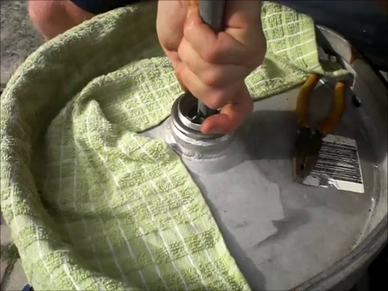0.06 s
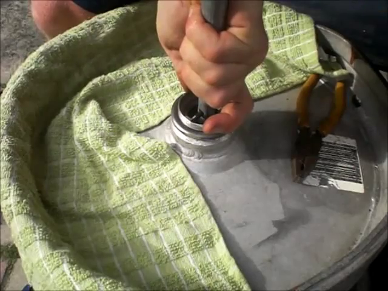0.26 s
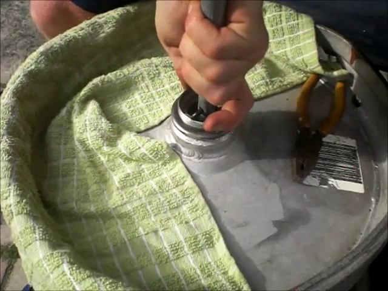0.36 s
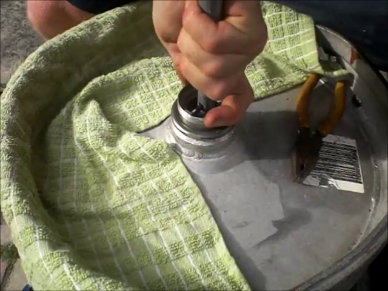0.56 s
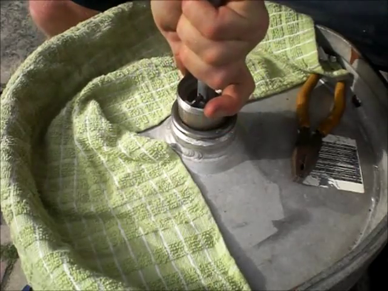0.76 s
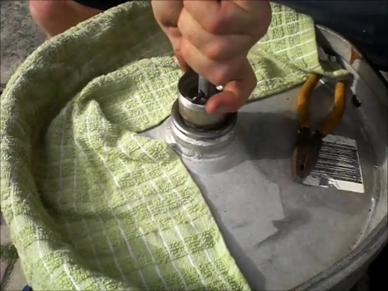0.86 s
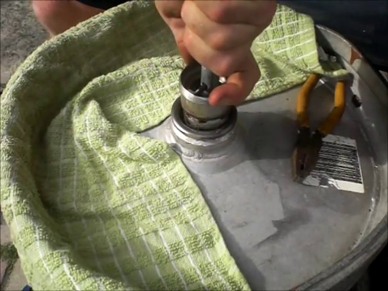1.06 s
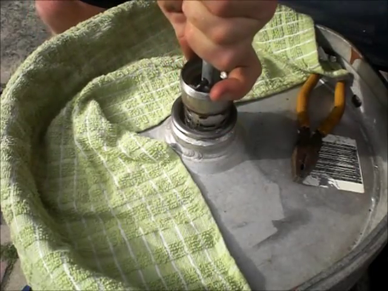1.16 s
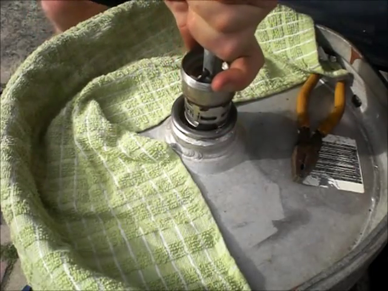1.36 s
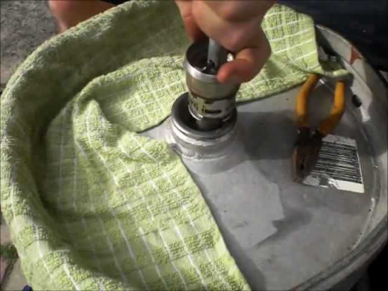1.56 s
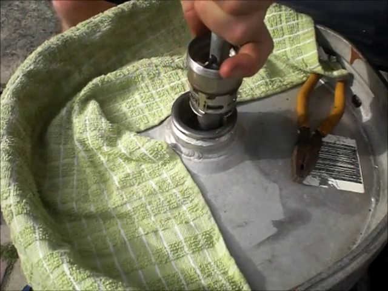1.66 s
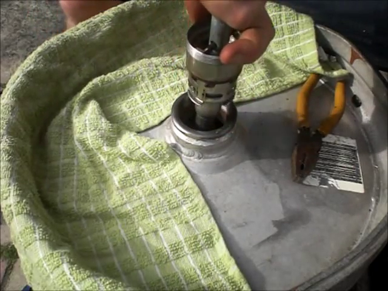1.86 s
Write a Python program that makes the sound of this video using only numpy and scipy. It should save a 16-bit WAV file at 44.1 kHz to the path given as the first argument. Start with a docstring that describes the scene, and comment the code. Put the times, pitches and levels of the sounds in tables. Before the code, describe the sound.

A metal valve knocks and scrapes out of an empty steel keg, close by indoors. Gas hisses thinly first, the valve judders loose with small ticks, then its tube bumps and rubs out with a fading hollow ring.

```python
"""A valve and its long tube are worked out of the neck of an empty steel keg, close by, indoors.
First gas hisses thinly past the seal while the seated valve knocks dully and turns.
Next the valve judders up through the neck, sticking and slipping, and steel edges tick together.
Then the tube bumps and rubs on its way out, ringing with a hollow note that slowly sinks.
Last, the ringing fades and the gas breathes softly from the open neck over a low room murmur."""
import sys
import numpy as np
from scipy import signal
from scipy.fft import rfft, irfft
from scipy.io import wavfile

SR = 44100
rng = np.random.default_rng(int(sys.argv[2]) if len(sys.argv) > 2 else 0)


def file_out(sig):
    """Save sig as 16-bit WAV at sys.argv[1]."""
    # one column per channel
    cols = np.atleast_2d(sig).T
    # limit, then scale
    lim = np.clip(cols, -1, 1)
    pcm = np.round(lim * 32767).astype(np.int16)
    wavfile.write(sys.argv[1], SR, pcm)


N = 83790
T = np.arange(N) / SR

# Blows on the neck: t/s, thud level/dB, thud cut-off f/Hz,
# then level/dB for the boom, hollow, middle, upper and shell notes
KNOCKS = [(.169, -24, 2050, -40, -55, -39, -29, -44), (.2352, -7, 3030, -21, -22.5, -16.5, -55, -26.5),
          (.3395, -4.5, 770, -24, -38, -52, -50, -60), (.3442, -3, 930, -19, -38, -37, -36, -52),
          (.3735, -9, 690, -41, -23.5, -16, -33, -45), (.3803, -4, 750, -44, -10, -11.5, -40, -53),
          (.3885, -8, 2210, -31, -14.5, -16.5, -23, -17), (.3962, -12.5, 2600, -56, -59, -22, -34, -18.5),
          (.564, -23, 1000, -68, -17.5, -23, -25, -40), (0.7066, -13.5, 2800, -46, -23, -16, -14, -45),
          (.868, -9, 850, -20.5, -10.5, -19.5, -17, -45), (1.0022, -12.5, 2210, -26.5, -14, -13, -5, -49),
          (1.073, -12, 1420, -33, -24.5, -14.5, -13.5, -34.5),
          (1.149, -20, 1300, -43, -28, -23.5, -16, -50), (1.209, -21, 1000, -34, -19, -23, -25, -42),
          (1.264, -34, 1010, -43, -31.5, -52, -20.5, -57), (1.302, -17, 830, -29.5, -18.5, -20, -41, -60),
          (1.356, -31, 1100, -44, -39, -27, -22, -38), (1.3945, -19.5, 1050, -38, -21, -17.5, -12, -36),
          (1.478, -38, 700, -45, -24.5, -51, -34, -60)]
def knocks():
    """The push of each blow; where it lands decides which group of notes rings most."""
    times, _, _, *group_db = np.transpose(KNOCKS)
    thud = sum(soften(clicks([s], [db]), hz) for s, db, hz, *_ in KNOCKS)
    return np.array([thud] + [clicks(times, db) for db in group_db])


# How hard each rub pushes: t/s, level/dB
SEAT = [(0, -34.5), (.2, -30), (.33, -24.5), (.42, -6.5), (.47, -18.5), (.54, -13), (.585, -7.5),
        (.615, -13), (.65, -50)]  # the valve turns in its seat
JUDDER = [(.6, -14), (.635, -2), (.66, -2), (.69, 5), (.706, 2), (.716, -30), (.76, -6.5), (.8, -21),
          (.85, -50)]  # it shakes through the neck
SLIDE = [(.72, -25), (.77, -20.5), (.83, -11.5), (.9, -11), (.98, -14), (1.09, -6.5), (1.25, -12.5),
         (1.33, -11.5), (1.43, -8.5), (1.49, -16.5), (1.54, -26.5), (1.66, -24), (1.9, -37)]  # the tube slides out
# Rubs: push table, slips per second, timing spread, cut-off f/Hz,
# then level/dB for the thud, boom, hollow, middle, upper and shell notes
STROKES = [(SEAT, 300, 0.32, 2170, -12, -41, -26, -32, -56, -43),
           (JUDDER, 225, 0.22, 2230, -15.5, -42, -24, -22.5, -27, -31.5),
           (SLIDE, 300, 0.6, 1066, -19, -35, -23.5, -28.5, -22.5, -37)]
def rubbing(force, rate, jitter, contact_hz, *group_db):
    """Steel sticks and slips, giving a run of small pushes, uneven in time and strength."""
    chance = rng.standard_normal((1000, 2))
    times = force[0][0] + np.cumsum(np.exp(jitter * chance[:, 0])) / rate
    db = np.interp(times, *np.transpose(force), right=-np.inf) + 1.8 * chance[:, 1]
    return np.outer(from_db(group_db), soften(clicks(times, db), contact_hz))


# Notes of the keg and tube: f/Hz, level/dB, fade t/s (time to drop by 60 dB)
THUD = [(561, -11.5, 0.019), (658, 0, 0.028), (780, -2, 0.017), (912, -6.5, 0.024), (1042, -2, 0.023),
        (1185, -5, 0.049), (1515, -7.5, 0.013), (1926, -13.5, 0.017), (2285, -11, 0.023)]  # the keg's top, dying fast
BOOM = [(157, -14, 0.068), (249.6, -4.5, 0.088), (303.2, -5.5, 0.22), (387.3, -4, 0.17), (436, 5.5, 0.057),
        (459.8, 2, 0.062)]  # its deep notes
HOLLOW = [(493, -22.5, 0.63), (641.4, 2.5, .33), (700, -26, 0.16), (572, -23.5, 0.52), (670, -13, 0.085)]  # the tube's hollow notes
MIDDLE_LOW = [(805, -0.5, 0.22), (826.5, -8, 0.47)]
MIDDLE_HIGH = [(856.4, -3.5, 0.17), (910.8, -11, 0.2)]
UPPER = [(1063, -9, 0.087), (1209, -4.5, 0.19), (1239, -10, 0.11)]
SHELL = [(1354, -8, 0.44), (1301, -21, 1), (1550, -16, 0.3), (1674, -18.5, 0.79), (2050, -28, 0.37),
         (2140, -5.5, 0.17), (2217, -18.5, 0.66), (2260, -14, 0.44), (2285, -17, 0.52), (2380, -21, .25)]  # the clang of the keg's wall
# The loudest hollow note sinks as the tube rises, and its group follows: t/s, f/Hz
HOLLOW_PITCH = [(.3, 646), (.6, 632), (.75, 632.8), (1.0, 629.2), (1.35, 630.6), (1.7, 621.3)]
# The touching point slides, lifting the high middle notes and lowering the low ones: t/s, level/dB
LEAN = [(.24, 5.5), (.39, 0.5), (.6, 7), (.7, 0), (.87, -4.5), (1.0, 7.5), (1.15, 6), (1.25, -3.5),
        (1.4, -3), (1.7, -8.5)]
# Nearby surfaces bounce the thud back: delay t/s, level/dB
ECHOES = [(.0068, -11.5), (0.0123, -14)]
def keg(thud, boom, hollow, middle, upper, shell):
    """The keg and tube ring when pushed, each group of notes driven by its own force."""
    top = ring(thud, THUD)
    echoes = sum(from_db(db) * np.interp(T - delay, T, top, left=0) for delay, db in ECHOES)
    sink = curve(HOLLOW_PITCH) / HOLLOW[1][0]
    lean = from_db(curve(LEAN))
    tube = ring(hollow, HOLLOW, sink) + ring(upper, UPPER)
    tube += ring(middle / lean, MIDDLE_LOW) + ring(middle * lean, MIDDLE_HIGH)
    body = top + echoes + tube + ring(boom, BOOM) + ring(shell, SHELL)
    bass_cut = signal.butter(2, 187, "high", fs=SR, output="sos")  # deep bass barely reaches the air
    return signal.sosfilt(bass_cut, body)


# Steel edges touch: t/s, crack level/dB, ping level/dB, favoured f/Hz
TICKS = [(0.0414, -35, -44, 3800), (0.3865, -25.5, -44, 5000), (0.3961, -38, -20, 4340),
         (0.687, -30.5, -40, 6500), (.702, -44, -33, 6000), (0.8666, -30, -42, 7000), (0.9, -33, -31, 5000),
         (0.905, -35.5, -36.5, 8000), (1.001, -30, -51, 4500), (1.156, -38, -50, 10000),
         (1.265, -34.5, -24.5, 8400), (1.308, -42, -30.5, 3500), (1.348, -51, -36, 5660),
         (1.3738, -31, -20.5, 9400), (1.394, -40, -22.5, 3580), (1.437, -35, -23.5, 6200)]
# Tone of the crack: f/Hz, level/dB
CRACK = [(1500, 5.5), (3500, 7), (6000, 0.5), (9000, -0.5), (16000, -4.5)]
# Notes of the valve body: f/Hz, level/dB, fade t/s
VALVE = [(3660, -15, 0.12), (3812, -6, 0.086), (4186, -9, 0.046), (5610, -9.5, 0.03), (5655, -7.5, 0.085),
         (5930, -9, 0.032), (6020, -12.5, 0.076), (6630, -9, 0.084), (8120, -7.5, 0.021),
         (8180, -19.5, 0.17), (12800, -9, 0.022), (13120, -10, 0.019)]
def ticks():
    """Each touch of steel makes a short crack of noise and a ping of the valve."""
    times, crack_db, ping_db, pitch = np.transpose(TICKS)
    fade_s, rise_s = 0.082, 0.00077
    burst = from_db(-60 * T / fade_s) * (1 - np.exp(-T / rise_s))
    crack = signal.fftconvolve(clicks(times, crack_db), burst)[:N] * noise(CRACK)
    pings = 0
    for note in VALVE:
        octaves_away = abs(np.log2(note[0] / pitch))
        pings += ring(clicks(times, ping_db - 15.5 * octaves_away), [note])
    return crack + pings


# Fine scratching of the valve: t/s, level/dB
GRIT = [(.38, -66), (.41, -39.5), (.55, -63.5), (.7, -42), (.76, -59), (.95, -51), (1.25, -53.5),
        (1.34, -50), (1.41, -41), (1.48, -46), (1.58, -64)]
def grit():
    """Tiny catches of steel on steel keep the valve ringing."""
    catches_per_s, spread_db = 820, 7.5
    catches = rng.random(N) < catches_per_s / SR
    strength = from_db(spread_db * rng.uniform(-1, 1, N)) * rng.choice([-1, 1], N)
    return from_db(curve(GRIT)) * rms_one(ring(catches * strength, VALVE))


# Loudness of the gas at the seal, gap and neck, and of its whistle: t/s, level/dB
SEAL_LEVEL = [(0, -45.5), (.08, -41.5), (.17, -35), (.32, -33), (.385, -38), (.41, -77), (.5, -77)]
GAP_LEVEL = [(.35, -70), (.42, -47.5), (.53, -39), (.58, -46.5), (.62, -39), (.7, -42.5), (.73, -43.5),
             (.87, -46), (.98, -58), (1.1, -66)]
NECK_LEVEL = [(0, -49.5), (.8, -50.5), (.93, -44), (1.05, -47), (1.25, -45.5), (1.42, -43), (1.55, -43),
              (1.9, -41)]
WHISTLE_LEVEL = [(0, -44.5), (.1, -42), (.25, -43.5), (.38, -47), (.5, -72)]
# Tone of each hiss: f/Hz, level/dB
SEAL_TONE = [(1500, -0.5), (3800, -1.5), (5400, -1.5), (6200, 6), (7000, -6), (8500, -5), (10000, 4.5),
             (12500, 0.5), (14300, 4.5), (16000, 0.5)]
GAP_TONE = [(1500, -3), (2800, 2), (3700, 8.5), (5200, 0), (5800, 0), (7500, -7), (9600, -1), (10400, 5),
            (12500, -4.5), (14300, 5), (16000, -4)]
NECK_TONE = [(820, -51), (1400, 1), (1550, 0), (1710, -1.5), (3160, 1), (3570, -1.5), (5900, -2),
             (7140, -9), (10900, -10), (15500, -14)]
def gas():
    """The last gas hisses and whistles past the seal, then escapes by the gap and the open neck."""
    openings = [(SEAL_LEVEL, SEAL_TONE), (GAP_LEVEL, GAP_TONE), (NECK_LEVEL, NECK_TONE)]
    hiss = sum(from_db(curve(level)) * noise(tone) for level, tone in openings)
    whistle_hz, width_hz = 4795, 140
    narrow_band = signal.iirpeak(whistle_hz, whistle_hz / width_hz, SR)
    whistle = signal.lfilter(*narrow_band, rng.standard_normal(N))
    return hiss + from_db(curve(WHISTLE_LEVEL)) * rms_one(whistle)


# Tone of the room's echo: f/Hz, level/dB
ROOM_TONE = [(100, -11), (250, -11.5), (500, 19), (1000, 7), (2500, 26.5), (8000, -4)]
def room(x):
    """The walls return the sound as a short, quiet blur."""
    fade_s, rise_s = .35, 0.031
    tail = noise(ROOM_TONE) * from_db(-60 * T / fade_s) * np.clip(T / rise_s, 0, 1)
    return from_db(-23) * signal.fftconvolve(x, tail / np.sqrt(np.sum(tail ** 2)))[:N]


# Tone of the room's murmur: f/Hz, level/dB
MURMUR_TONE = [(25, -12), (45, 2), (65, 5), (95, 2), (150, 2.5), (400, 7.5), (700, 8.5), (1400, -11),
               (3000, -35)]
# Its loudness: t/s, level/dB
MURMUR_LEVEL = [(0, -45.5), (.5, -49.5), (1.0, -44), (1.45, -43.5), (1.9, -45.5)]
def background():
    """A low murmur and a steady 67 Hz hum fill the room."""
    hum = from_db(-56) * np.sqrt(2) * np.sin(2 * np.pi * 67 * T)
    return from_db(curve(MURMUR_LEVEL)) * noise(MURMUR_TONE) + hum


def from_db(db):
    """Turn decibels into a multiplier."""
    return 10 ** (np.asarray(db) / 20)


def curve(rows):
    """Join (time, value) points by straight lines."""
    return np.interp(T, *np.transpose(rows))


def rms_one(x):
    """Scale to an average power of one."""
    return x / np.sqrt(np.mean(x ** 2) + 1e-20)


def noise(tone):
    """Even noise shaped by a tone table."""
    hz, db = np.transpose(tone)
    gain = from_db(np.interp(np.log(np.fft.rfftfreq(N, 1 / SR) + 1), np.log(hz), db))
    return rms_one(irfft(rfft(rng.standard_normal(N)) * gain, N))


def clicks(times, db):
    """Sharp taps at the given times and levels."""
    samples = np.clip(np.asarray(times) * SR, 0, N).astype(int)
    return np.bincount(samples, from_db(db), N + 1)[:N] + 1e-18


def soften(force, hz):
    """A soft contact dulls the blow above the cut-off."""
    return signal.sosfilt(signal.butter(2, hz, fs=SR, output="sos"), force)


def ring(force, notes, stretch=1):
    """A push starts notes that fade away; stretch bends all their pitches together."""
    turn, out = 2 * np.pi * np.cumsum(stretch * np.ones(N)) / SR, 0
    for k, (hz, db, fade_s) in enumerate(notes):
        wave = np.exp(1j * hz * turn)
        decay = np.exp(-np.log(1000) / (fade_s * SR))
        swing = signal.lfilter([1], [1, -decay], force / wave)
        out += (-1) ** k * from_db(db) * (wave * swing).imag
    return out


def scene():
    """Metal, its echo and the gas over the room's murmur."""
    forces = knocks() + sum(rubbing(*stroke) for stroke in STROKES)
    metal = keg(*forces) + ticks() + grit()
    murmur = background()
    return (metal + room(metal) + gas() + murmur)[None]


def record(dry):
    """The microphone loses a thin band at 7080 Hz, clips peaks and cuts the highest treble."""
    notched = signal.lfilter(*signal.iirnotch(7080, Q=42, fs=SR), dry)
    treble_cut = signal.ellip(10, .1, 80, 15900, fs=SR, output="sos")
    return signal.sosfilt(treble_cut, np.clip(notched, -1, 1))


dry = scene()
out = record(dry)
file_out(out)
```